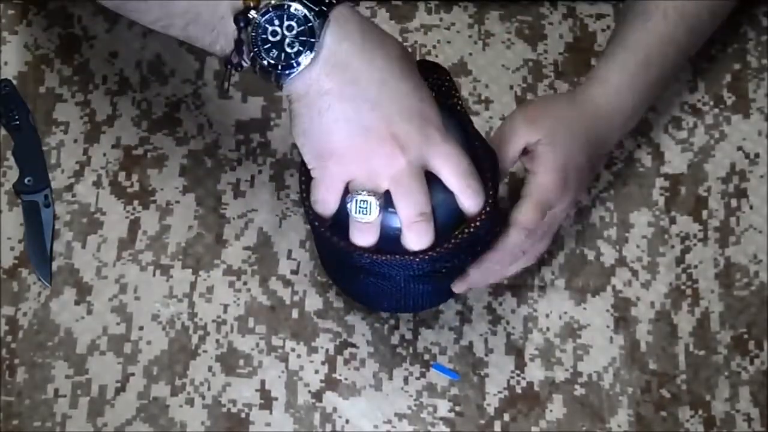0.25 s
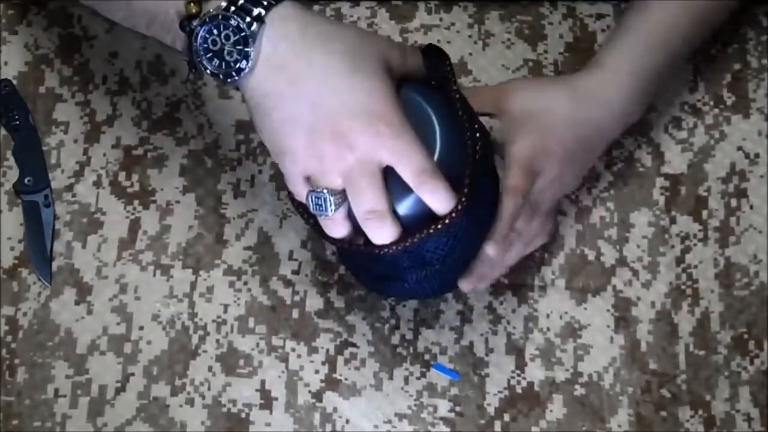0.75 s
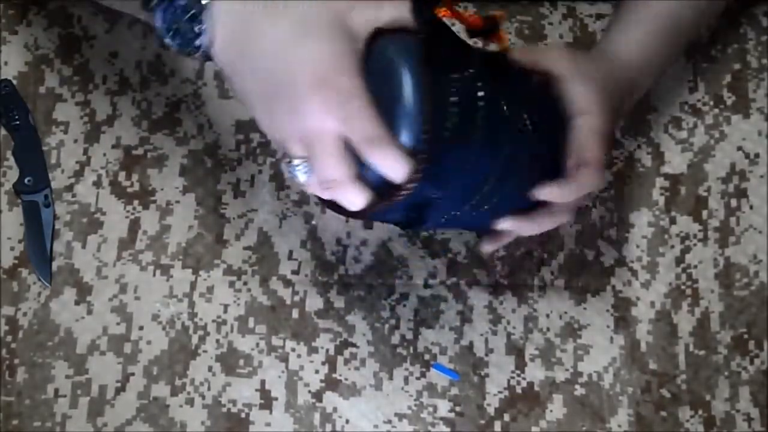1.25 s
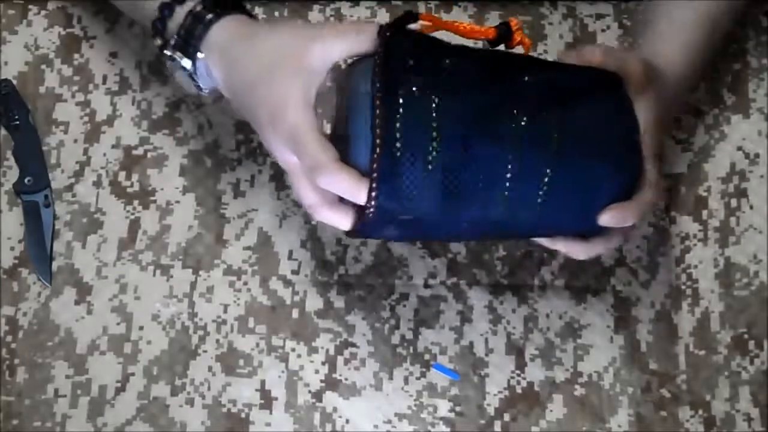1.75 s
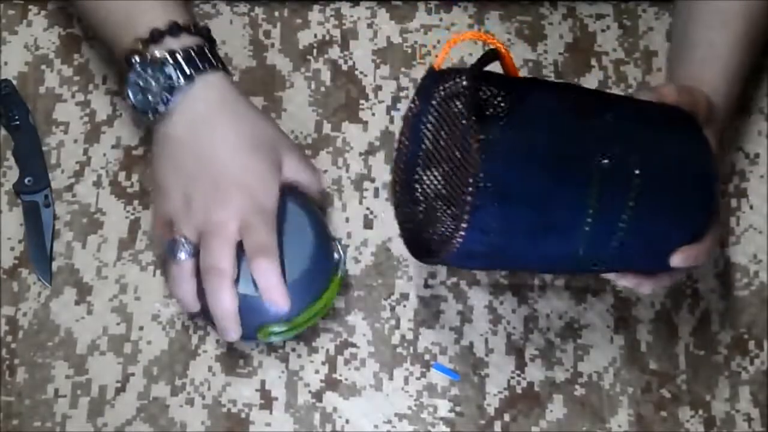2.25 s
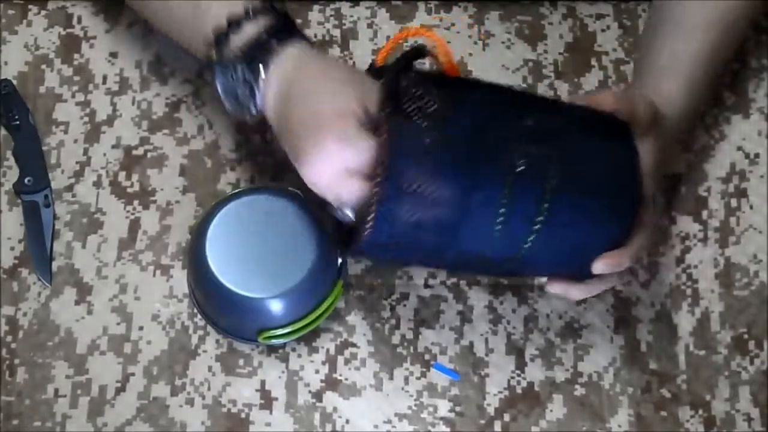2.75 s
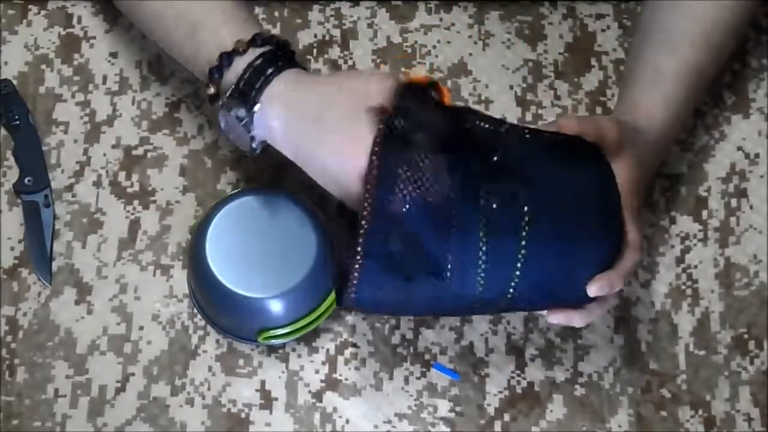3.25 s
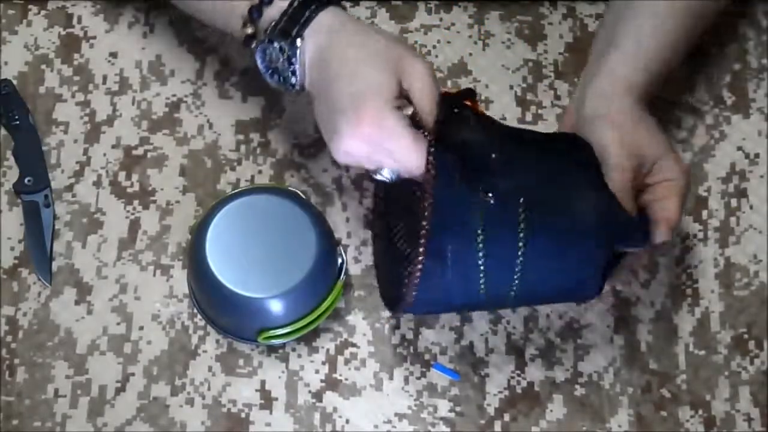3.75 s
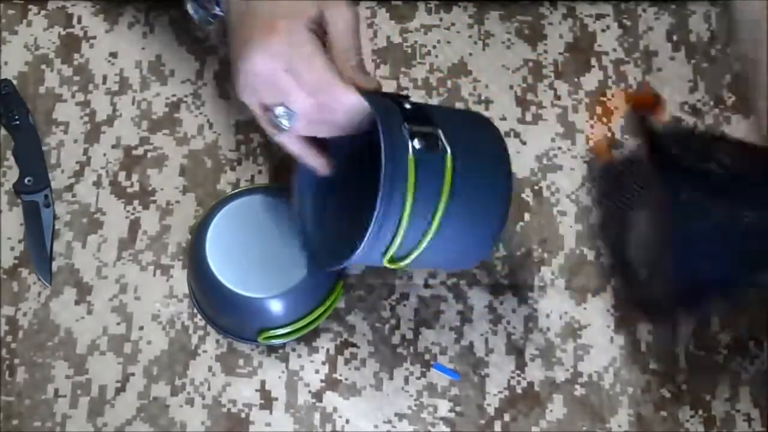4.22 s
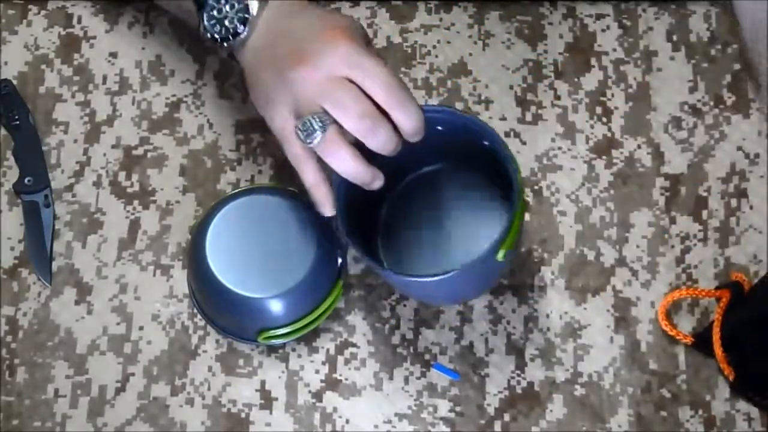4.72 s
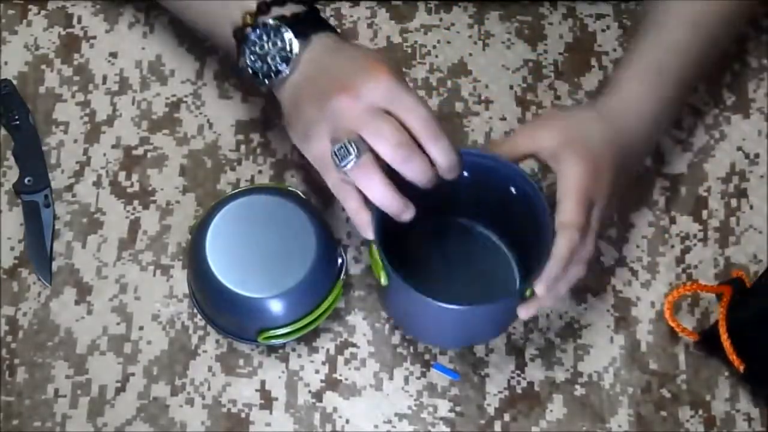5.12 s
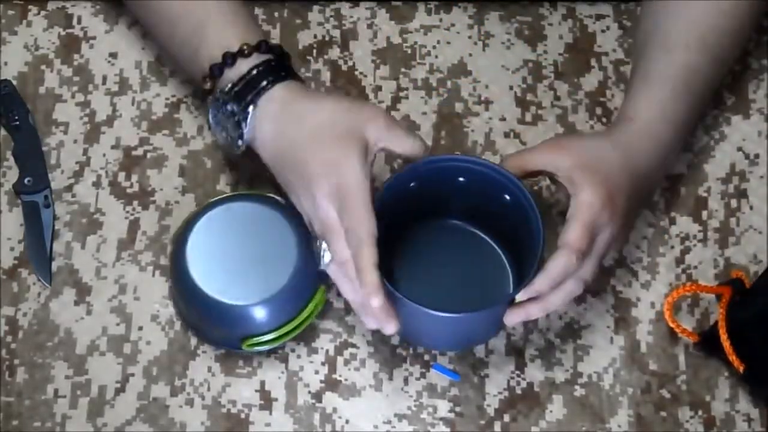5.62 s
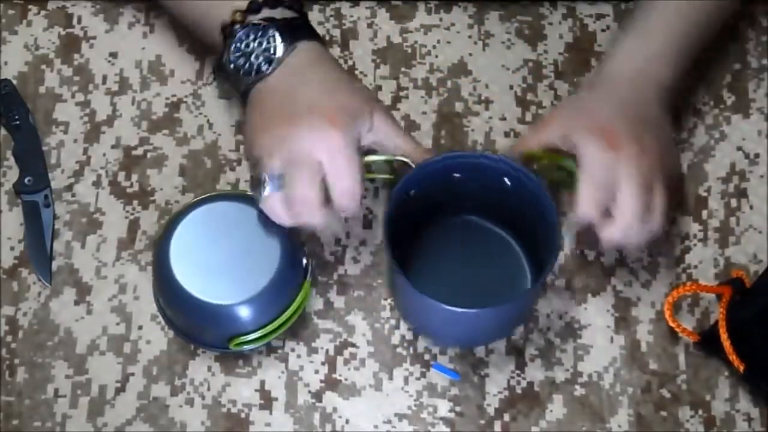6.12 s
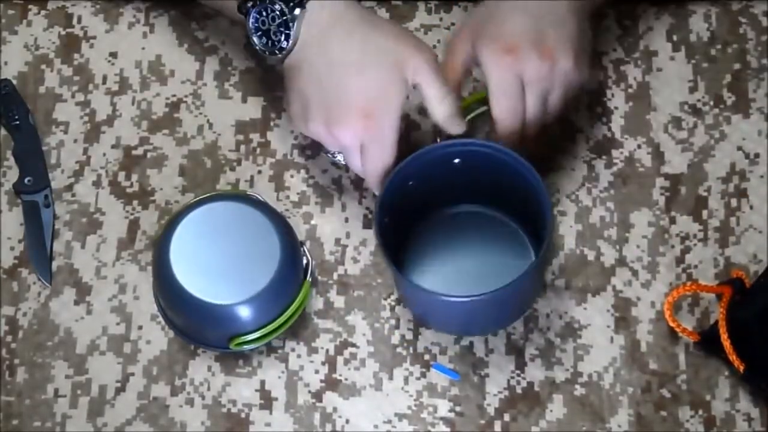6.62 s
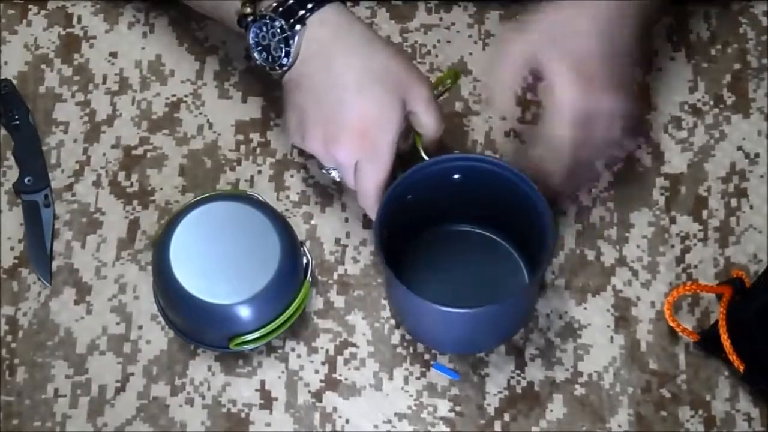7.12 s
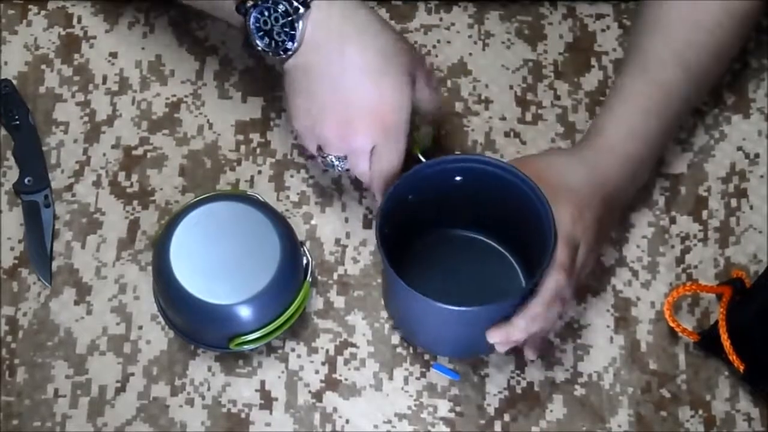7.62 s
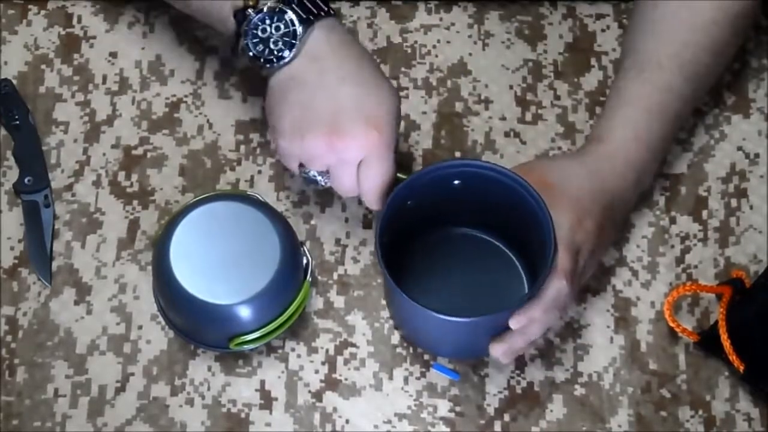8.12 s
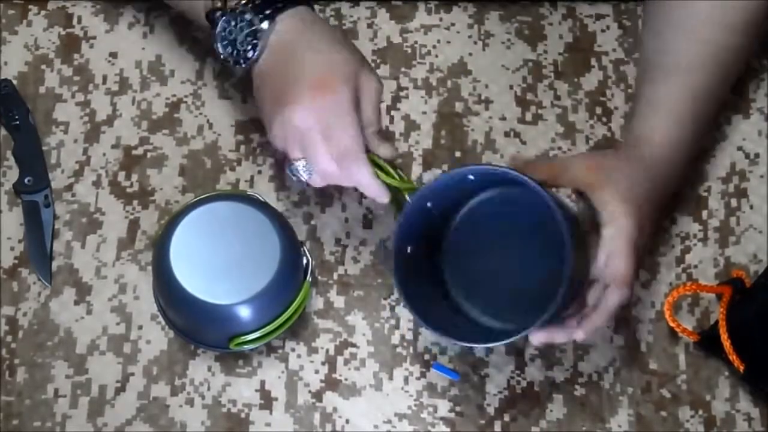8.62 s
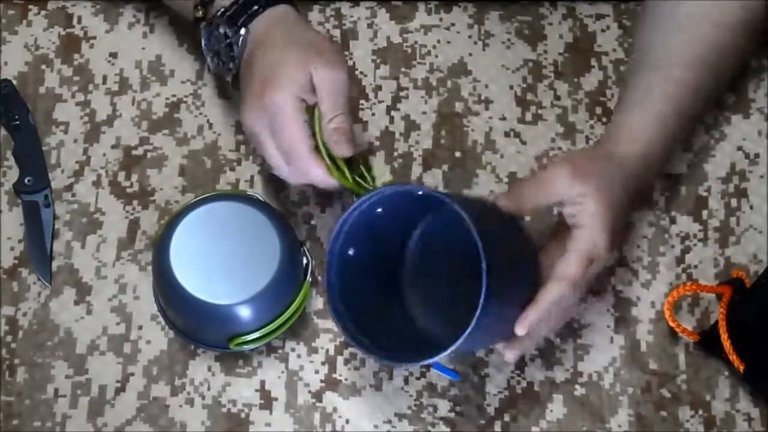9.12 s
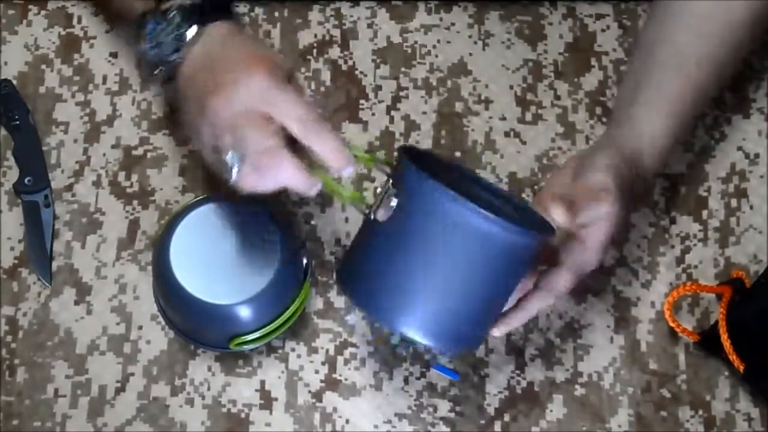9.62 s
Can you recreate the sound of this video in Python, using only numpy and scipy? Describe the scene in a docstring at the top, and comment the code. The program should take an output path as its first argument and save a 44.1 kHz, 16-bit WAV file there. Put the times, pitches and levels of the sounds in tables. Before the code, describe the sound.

Close up in a small room, lightweight metal camping pots are pulled apart with a few bright clanks and rim scrapes. Two dull thuds on a covered table follow, with a soft swish of a sack between them. A wire handle then clicks and gives a short, rough squeak. Soft rasps, small metallic taps and fingers sliding over the pot fill the rest, above a faint hum and hiss.

```python
"""Unpacking camping pots

Nested pots of thin metal are unpacked on a cloth-covered table in a small room. The bowl clanks
against the pot as it is worked out of a mesh sack, and both are set down with a thud. Then the
pot's wire handles click, squeak in their hinges and swing together, and fingers slide over its wall.
Each knock is a few clear tones plus a burst of clatter; rubbing is a stream of tiny contacts."""
import sys
import numpy as np
from scipy import signal
from scipy.fft import rfft, irfft, next_fast_len
from scipy.io import wavfile
from scipy.ndimage import uniform_filter1d

SR = 44100
rng = np.random.default_rng(int(sys.argv[2]) if len(sys.argv) > 2 else 0)


def generate_wav(signal):
    """Clip the signal to [-1, 1] and save it as 16-bit WAV at the path in sys.argv[1]."""
    frames = np.transpose(np.atleast_2d(signal))
    scaled = np.clip(frames, -1, 1) * 32767
    pcm = np.round(scaled).astype(np.int16)
    wavfile.write(sys.argv[1], SR, pcm)


N = 434826
TIME = np.arange(N) / SR
RING_TIME = np.arange(SR * 3 // 4) / SR  # the time axis of one knock

# Tones of the lone pot and of a wire handle: f/Hz, level/dB, fade/s (time to fall by 60 dB)
POT_TONES = [(633, -0.5, 0.099), (708, -0.5, 0.14), (1384, -5, 0.11), (1670, -26, 0.2), (2377, -18.5, 0.29),
             (2780, -8.5, 0.096), (3950, -9.5, 0.18), (4400, -13, 0.13), (4840, -6.5, 0.036),
             (4900, -10, .15), (5470, -13, 0.25), (6500, 3.5, 0.04), (7260, -9, 0.19), (8310, -17, 0.18),
             (10000, -35, .1), (11500, -24, 0.12)]
WIRE_TONES = [(1060, 0.5, 0.35), (1870, -14, 0.29), (2106, 6.5, 0.21), (3596, -11, 0.51), (4110, 1, 0.087),
              (5300, 11, 0.081), (7250, -9, 0.25), (8540, -7, 0.6), (9770, 1, 0.073), (10900, -4, 0.38)]
# Blur of many short tones, bright in thin metal and dull in the table top: f/Hz, level/dB
METAL_CLATTER = [(60, -9), (250, -12), (500, 9), (830, 3), (1080, 7.5), (1270, -2.5), (2000, 1),
                 (3500, -2.5), (5000, -1.5), (5900, -8), (7000, -4.5), (11000, -5), (16000, -3.5)]
TABLE_CLATTER = [(25, -37), (60, 9.5), (165, -2.5), (240, -6), (500, -10), (1000, -11), (1500, -14),
                 (3000, -34), (16000, -12.5)]


def nested_pots():
    """Bowl and pot ring together as they clank, scrape rim on rim and get bumped."""
    # f/Hz, level/dB, fade/s
    nest_tones = [(246.6, -1, 0.067), (411.5, -17, 0.13), (440.5, 4, 0.12), (577, -9.5, 0.096),
                  (653, -12.5, 0.31), (676, 1.5, 0.12), (1037, -2, 0.11), (1104, -28, 0.11),
                  (1162, -9, 0.17), (1363, -9.5, 0.27), (1660, -12, 0.17), (1930, -3, 0.11),
                  (1950, 1.5, 0.092), (2096, -25, 0.077), (2190, -12, 0.31), (2337, -23.5, 0.27),
                  (2700, -20, 0.14), (2780, -10, 0.12), (3170, 3.5, 0.028), (3333, -6, 0.13),
                  (3840, -9, 0.082), (3980, 1, 0.098), (4060, -2.5, 0.14), (4430, -2, 0.051),
                  (5200, -24, 0.059), (5040, 2, 0.036), (5320, -17, 0.066), (6470, -5, 0.078),
                  (6750, 3, 0.046), (7330, -26, 0.14), (8100, -47, 0.14), (8700, -10, 0.13)]
    # The bowl hits the pot: t/s, level/dB, highest f/Hz, ring of the first touch/dB
    clanks = [(1.3674, -30.5, 9200, 3), (1.495, -31, 12100, 3), (1.665, -25.5, 11200, -2.5)]
    # Rim slides on rim: t/s, level/dB, swell/s, lowest f/Hz
    scrapes = [(.554, -47.5, .018, 1490), (0.7728, -40.5, .003, 1150), (1.543, -36, 0.0077, 403),
               (1.570, -40, .011, 402), (1.861, -34.5, 0.024, 437)]
    # Dull bumps on the bowl: t/s, level/dB, centre f/Hz
    bumps = [(.505, -57, 980), (2.040, -50.5, 695), (2.469, -37, 630), (2.496, -36.5, 704)]
    clank_ring_db, scrape_ring_db, bump_ring_db = -3.5, -5.5, -1.5
    hits = []
    for t, db, high_hz, touch_ring_db in clanks:
        hits += [(t, db - 3, .0012, 348, 5500, touch_ring_db),  # a duller first touch
                 (t + .0045, db, .0009, 348, high_hz, clank_ring_db),  # the far rim hits
                 (t + .012, db - 6.5, .0006, 1820, high_hz, clank_ring_db)]  # thin chatter
    for t, db, swell, low_hz in scrapes:
        hits += [(t - .6 * swell, db - 9.5, swell, low_hz, 8250, scrape_ring_db),  # a light graze first
                 (t, db, swell, low_hz, 8250, scrape_ring_db)]
    hits += [(t, db, .00088, hz / 1.25, hz * 1.25, bump_ring_db) for t, db, hz in bumps]
    return knocks(hits, nest_tones, METAL_CLATTER, clatter_fade_s=.089, echo_db=-4)


def table_thuds():
    """The table thuds twice as a pot lands and rocks on to its other edge, and once under a nudge."""
    # f/Hz, level/dB, fade/s
    table_tones = [(52.4, 12, 0.11), (63.9, -16, 0.42), (105, -3.5, 0.33), (161.8, -11, 0.35),
                   (216.6, 2.5, 0.12), (238, 6.5, 0.11), (285, -5.5, 0.26), (314.5, -0.5, 0.07),
                   (471.5, -9.5, 0.2), (591, -6, 0.093), (670, -6.5, 0.073), (893, -12, 0.09),
                   (1060, 3, 0.024)]
    # t/s, level/dB, lowest f/Hz, highest f/Hz, rocking time/s, second thud against the first/dB
    landings = [(2.4685, -23.5, 163, 785, .0265, -2.5), (4.611, -43.5, 188, 585, 0.017, 5),
                (5.3515, -20, 55, 670, .0175, -8.5), (5.958, -38, 68.7, 206, 0.041, -3.5),
                (6.578, -51, 80, 600, 0.043, 3.5), (7.831, -43, 194, 317, .042, -0.5),
                (9.417, -56.5, 170, 400, 0.063, 3.5)]
    # A hand nudges the pot or the table: t/s, level/dB, centre f/Hz
    nudges = [(.757, -47, 217), (5.528, -42.5, 73), (5.815, -44, 124), (6.353, -47, 275), (6.972, -56, 520),
              (7.039, -52, 182), (7.487, -38.5, 94)]
    land_ring_db, nudge_ring_db = 7, -4
    hits = []
    for t, db, low_hz, high_hz, rock_s, second_db in landings:
        hits += [(t, db, .0011, low_hz, high_hz, land_ring_db),
                 (t + rock_s, db + second_db, .0011, low_hz, high_hz * 1.42, land_ring_db)]  # brighter
    hits += [(t, db, .0032, hz / 1.9, hz * 1.9, nudge_ring_db) for t, db, hz in nudges]
    return knocks(hits, table_tones, TABLE_CLATTER, clatter_fade_s=.19, echo_db=-18.5)


def pot_taps():
    """Fingers and handles tap the lone pot: a soft tap rings clearly, a hard, bright one clatters."""
    # t/s, level/dB, swell/s, lowest f/Hz, highest f/Hz
    taps = [(3.359, -53.5, .0007, 4400, 12300), (5.204, -58.5, .001, 600, 650),
            (5.352, -42.5, 0.00055, 594, 990), (5.36, -62.5, .002, 2500, 11000),
            (6.588, -56, .0008, 350, 2400), (6.672, -54, 0.0057, 400, 2260), (6.817, -55, .001, 2200, 6000),
            (7.519, -56.5, 0.0053, 1760, 3100), (7.740, -55.5, 0.0011, 830, 4370),
            (7.829, -44, 0.0068, 403, 11700), (7.872, -46.5, 0.00088, 282, 1330),
            (7.928, -52.5, .0005, 497, 2200), (8.311, -59.5, 0.00045, 560, 650),
            (8.559, -56.5, .0005, 560, 650), (8.815, -51, .0004, 650, 740)]
    hits = []
    for t, db, swell, low_hz, high_hz in taps:
        ring_db = 2.5 - 2 * np.log2(high_hz / 700)  # 2 dB less ring for each octave brighter
        hits.append((t, db, swell, low_hz, high_hz, ring_db))
    return knocks(hits, POT_TONES, METAL_CLATTER, clatter_fade_s=.066, echo_db=-2.5)


def handle_clicks():
    """A handle snaps in its bracket, which sets its wire ringing."""
    # t/s, level/dB, lowest f/Hz, highest f/Hz, ring/dB
    clicks = [(.560, -52.5, 1900, 2300, -4), (2.048, -52.5, 2000, 2190, 20),
              (2.08, -59.5, 8000, 16000, -15), (2.474, -60, 5000, 16000, -18),
              (2.497, -43.5, 1300, 4000, 1), (2.501, -48, 5000, 5600, 6), (2.507, -49, 4000, 16000, -21),
              (5.956, -52.5, 600, 14000, -15), (5.988, -58, 656, 4200, -22), (5.995, -47, 3500, 16000, -6)]
    hits = [(t, db, .0014, low_hz, high_hz, ring_db) for t, db, low_hz, high_hz, ring_db in clicks]
    return knocks(hits, WIRE_TONES, METAL_CLATTER, clatter_fade_s=.034, echo_db=-1.5)


def hinge_squeak():
    """The hinge sticks and slips: it makes a rough tone, grates on the pot and keeps the wire ringing."""
    # t/s, tone level/dB, grating level/dB
    loudness = [(5.987, -36, -46), (5.991, -39.5, -47), (6.009, -45, -47), (6.035, -38.5, -55),
                (6.049, -53, -54), (6.073, -40.5, -54), (6.097, -41, -56), (6.113, -47, -48.5),
                (6.127, -38, -53.5), (6.171, -71, -57.5), (6.18, -65, -68)]
    t, tone_db, grating_db = np.transpose(loudness)
    slip_hz = 1000 * (1 + .08 * wobble(samples=90))
    cycles = np.cumsum(slip_hz) / SR
    tone = unit_level(sum(amp(-18 * np.log2(k)) * np.cos(2 * np.pi * k * cycles) for k in range(1, 9)))
    wire = signal.oaconvolve(rng.standard_normal(N), ringing(WIRE_TONES))[:N]
    # f/Hz, level/dB
    wire_colour = [(2200, -12.5), (4170, -6), (5300, -29), (7300, -9), (8500, -24), (11000, -15)]
    wire = unit_level(coloured(wire, wire_colour))
    grit = coloured(grains(N, spread_db=4), METAL_CLATTER)
    grit = unit_level(band(grit, low_hz=600, high_hz=2120))
    grating = amp(2) * grit + amp(-2) * wire
    return room(level_curve(t, tone_db) * tone + level_curve(t, grating_db) * grating, echo_db=-8)


def handle_swings():
    """The sleeved handles rasp as they turn, one after the other, and the pot drags on the cloth."""
    # start/s, end/s, level/dB, hollow ring of the pot/dB
    swings = [(6.417, 6.64, -59, -15), (6.777, 7.01, -53, -4)]
    # Tone colour of the rasp: f/Hz, level/dB
    rasp_colour = [(200, -4), (700, -8), (1500, 12), (2700, 11.5), (5000, 7), (7000, 3), (11000, 1.5),
                   (16000, -5)]
    hiss, wall = rubbing(rasp_colour, spread_db=3.5)
    wall = unit_level(band(wall, low_hz=890, high_hz=3400))
    cloth = coloured(rng.standard_normal(N), TABLE_CLATTER)
    cloth = unit_level(band(cloth, low_hz=225, high_hz=746))
    rise_s, fall_db_per_s = .032, 130
    rasp, drag = np.zeros(N), np.zeros(N)
    for start, end, db, ring_db in swings:
        speed = np.clip((TIME - start) / rise_s, 0, 1) * amp(-fall_db_per_s * np.maximum(TIME - end, 0))
        rasp += speed * amp(db) * blend(hiss, wall, ring_db)
        drag += speed * amp(-59.5) * cloth
    return room(rasp * gripping(depth_db=1.5) + drag * gripping(depth_db=2), echo_db=-2.5)


def sack_and_fingers():
    """The pot rings freely as it slides out of the sack; sliding fingertips damp its ring."""
    # Both: start/s, end/s, level/dB
    sack_pulls = [(3.707, 3.983, -59.5), (3.947, 4.29, -60.5)]
    finger_slides = [(3.59, 3.672, -61.5), (5.883, 5.984, -58.5), (6.267, 6.40, -60), (6.417, 6.64, -57),
                     (7.454, 7.552, -64), (7.584, 7.677, -59), (8.277, 8.465, -64), (8.794, 8.95, -59.5),
                     (9.233, 9.584, -69.5), (9.679, 9.82, -59)]
    return room(strokes(sack_pulls, ring_db=0) + strokes(finger_slides, ring_db=-6), echo_db=-3.5)


def strokes(rows, ring_db):
    """Something hisses along the pot wall; each stroke swells and fades."""
    # Tone colour of the hiss and of the wall's ring: f/Hz, level/dB
    hiss_colour = [(200, -28), (700, -8), (1500, -17), (3000, -12), (4500, 1.5), (8000, 1.5), (12000, 0.5),
                   (16000, -4)]
    wall_colour = [(700, 4.5), (2000, -1), (4000, 7), (12000, -3)]
    hiss, wall = rubbing(hiss_colour, spread_db=5)
    wall = unit_level(coloured(wall, wall_colour))
    pressure = np.zeros(N)
    for start, end, db in rows:
        progress = np.clip((TIME - start) / (end - start), 0, 1)
        pressure += amp(db) * np.sqrt(abs(np.sin(np.pi * progress)))
    return pressure * gripping(depth_db=1.5) * blend(hiss, wall, ring_db)


def knocks(hits, tones, clatter_colour, clatter_fade_s, echo_db):
    """Each hit wakes clatter and clear tones; ring_db says how strong the tones are beside the clatter."""
    out = np.zeros(N)
    for t, db, swell_s, low_hz, high_hz, ring_db in hits:
        clatter = coloured(grains(len(RING_TIME), spread_db=4), clatter_colour)
        clatter = unit_energy(clatter * amp(-60 * RING_TIME / clatter_fade_s))
        build_up = (1 - np.exp(-RING_TIME / swell_s)) ** 1.47  # things touch and slide before they stop
        body = (clatter + amp(ring_db) * ringing(tones)) * build_up
        sound = unit_energy(band(room(body, echo_db), low_hz, high_hz))
        slot = out[round(t * SR):][:len(sound)]
        slot += amp(db) * np.sqrt(SR / 50) * sound[:len(slot)]  # the energy of 1/50 s at this level
    return out


def ringing(tones, twin_detune=.0082):
    """Fading tones; no object is perfectly even, so each has a weaker twin that makes it waver."""
    hz, db, fade_s = np.transpose(tones)[:, :, None]
    cycles = hz * RING_TIME + rng.random(hz.shape)
    twin = cycles + twin_detune * rng.standard_normal(hz.shape) * hz * RING_TIME + 1 / 4
    pairs = np.sin(2 * np.pi * cycles) + .5 * np.sin(2 * np.pi * twin)
    return unit_energy((amp(db - 60 * RING_TIME / fade_s) * pairs).sum(0))


def rubbing(colour, spread_db):
    """Friction makes two sounds: its own hiss, and the pot wall ringing under it."""
    friction = grains(N, spread_db)
    wall = signal.oaconvolve(friction, ringing(POT_TONES))[:N]
    return unit_level(coloured(friction, colour)), unit_level(wall)


def grains(size, spread_db):
    """Countless tiny contacts of unequal size."""
    noise = rng.standard_normal(size)
    return unit_level(noise * amp(spread_db * np.clip(rng.standard_normal(size), -2, 2)))


def gripping(depth_db):
    """The loudness flutters as a sliding contact grips and lets go many times a second."""
    return unit_level(amp(depth_db * wobble(samples=400)))


def room(x, echo_db):
    """Adds the small room's short echo, a little different each time, as things are moved about."""
    # How long the echo lasts: f/Hz, fade/s
    echo_fades = [(60, 0.29), (300, 0.25), (1000, 0.24), (4000, 0.23), (9000, 0.23), (16000, 0.2)]
    hz, t, bands = signal.stft(rng.standard_normal(len(RING_TIME)), SR, nperseg=256)
    bands = bands * amp(-60 * t / value_at(echo_fades, hz)[:, None])
    tail = signal.istft(bands, SR, nperseg=256)[1][:len(RING_TIME)]
    tail = unit_energy(tail * (RING_TIME > .004))  # the echo starts 4 ms late
    return blend(x, signal.oaconvolve(x, tail)[:len(x)], echo_db)


def background():
    """Steady rumble, hiss and a faint hum."""
    # Tone colour of the noise, and the tones of the hum: f/Hz, level/dB
    noise_colour = [(8.8, -44), (15, -8.5), (47, 3.5), (70, -12.5), (103, -9), (150, -13), (240, -15),
                    (321, -17), (350, -19.5), (592, -19.5), (865, -23.5), (972, -24), (1160, -25),
                    (14700, -35.5), (16000, -35)]
    hum_tones = [(90, -71.5), (179.5, -76.5), (350, -77)]
    hum = sum(amp(db) * np.sqrt(2) * np.sin(2 * np.pi * (hz * TIME + rng.random()))
              for hz, db in hum_tones)
    return amp(-58) * unit_level(coloured(rng.standard_normal(N), noise_colour)) + hum


def wobble(samples):
    """A random wiggle, slower the more samples it is smoothed over."""
    return unit_level(uniform_filter1d(rng.standard_normal(N), size=samples))


def coloured(x, colour):
    """Turns each frequency of x up or down along a smooth curve."""
    size = next_fast_len(len(x))
    gain = amp(value_at(colour, np.fft.rfftfreq(size, 1 / SR)))
    return irfft(rfft(x, size) * gain, size)[:len(x)]


def band(x, low_hz, high_hz):
    """Softens everything below low_hz and above high_hz."""
    for hz, kind in ((low_hz, "high"), (high_hz, "low")):
        x = signal.sosfilt(signal.butter(2, min(hz, SR / 2 - 100), kind, fs=SR, output="sos"), x)
    return x


def blend(x, extra, extra_db):
    """Mixes in a second sound and scales the sum back down."""
    return (x + amp(extra_db) * extra) / np.hypot(1, amp(extra_db))


def level_curve(t, db):
    """Loudness that follows the given points and is silent outside them."""
    return amp(np.interp(TIME, t, db)) * (TIME >= t[0]) * (TIME <= t[-1])


def value_at(points, hz):
    """Reads between the rows of a (frequency, value) table."""
    f, value = np.transpose(points)
    return np.interp(np.log(hz + 1), np.log(f + 1), value)


def amp(db):
    return 10 ** (np.asarray(db) / 20)


def unit_level(x):
    return x / np.sqrt(np.mean(x ** 2) + 1e-20)


def unit_energy(x):
    return x / np.sqrt(np.sum(x ** 2) + 1e-20)


def scene():
    """Pots, table and handles over the quiet of the room, in one channel."""
    pots_and_table = sack_and_fingers() + nested_pots() + pot_taps() + table_thuds()
    handles = handle_clicks() + hinge_squeak() + handle_swings()
    return (pots_and_table + handles + background())[None]


def record(dry):
    """Cuts off the very highest treble."""
    treble_cut = signal.firwin(511, cutoff=15850, window=("kaiser", 9), fs=SR)
    return signal.oaconvolve(dry, treble_cut[None], "same")


dry = scene()
out = record(dry)
generate_wav(out)
```